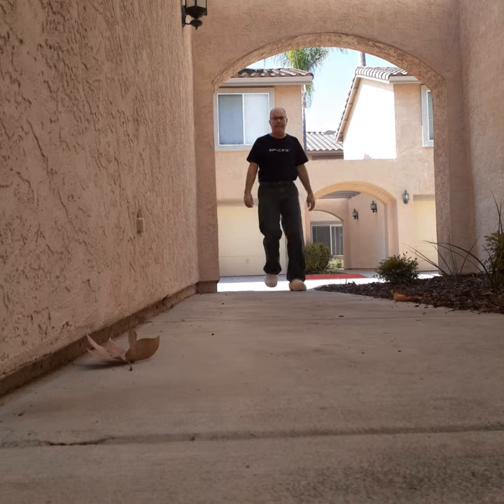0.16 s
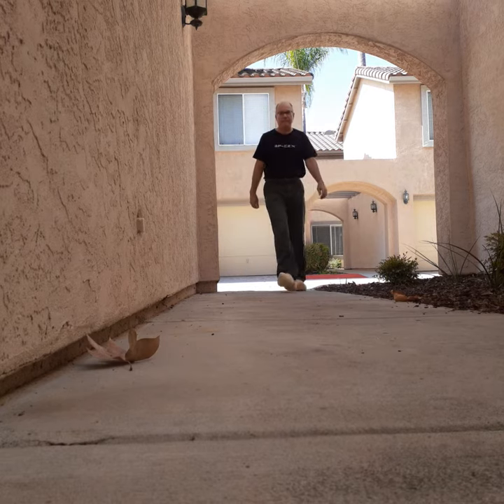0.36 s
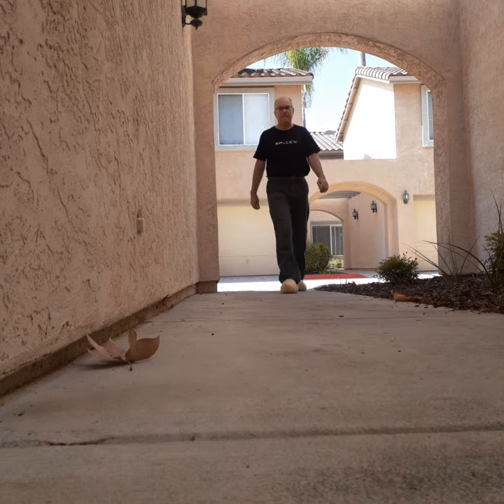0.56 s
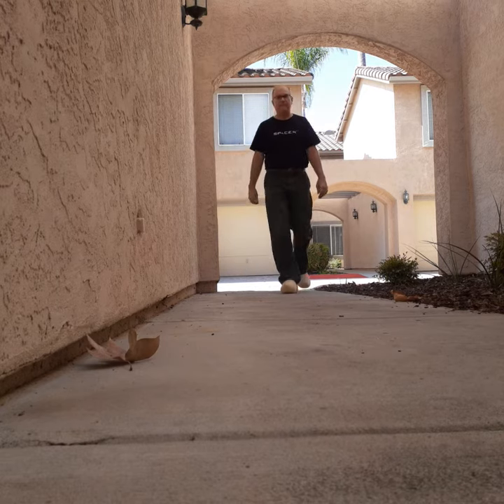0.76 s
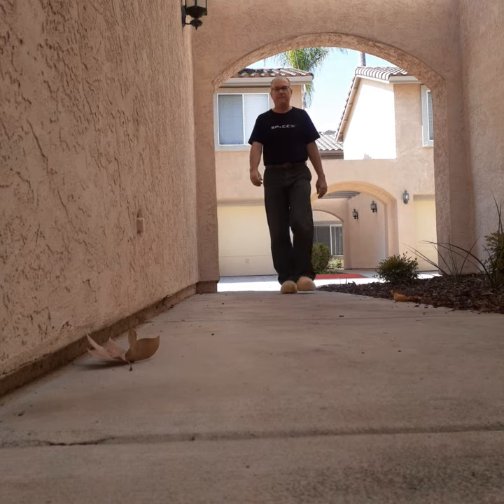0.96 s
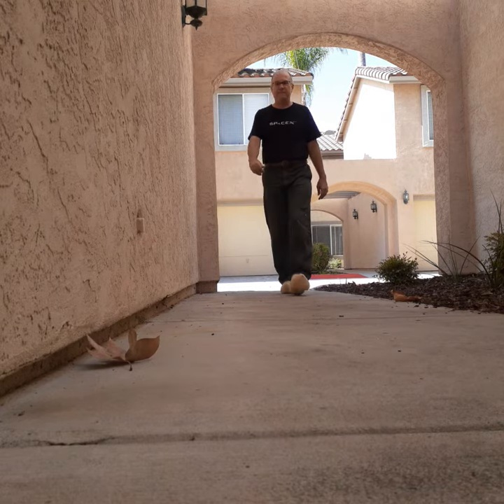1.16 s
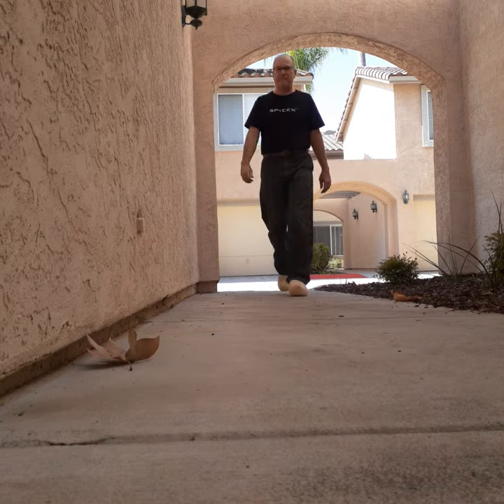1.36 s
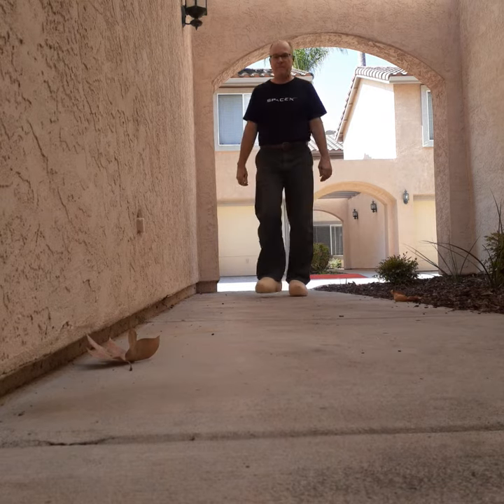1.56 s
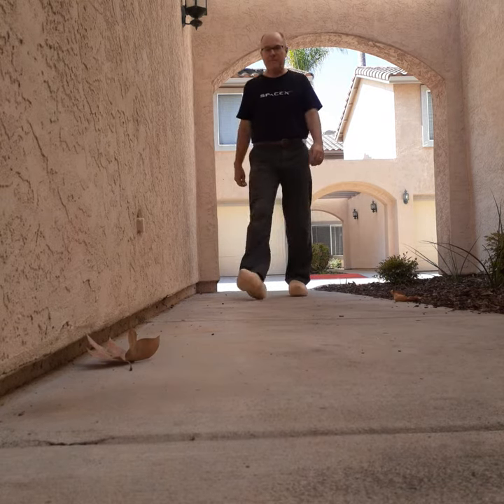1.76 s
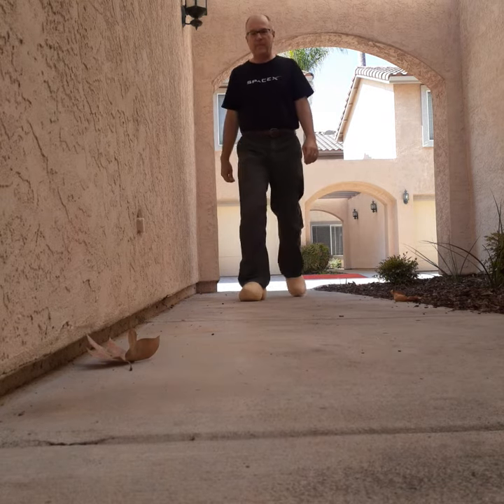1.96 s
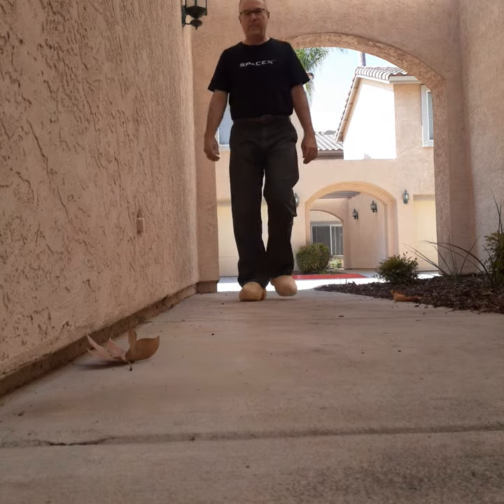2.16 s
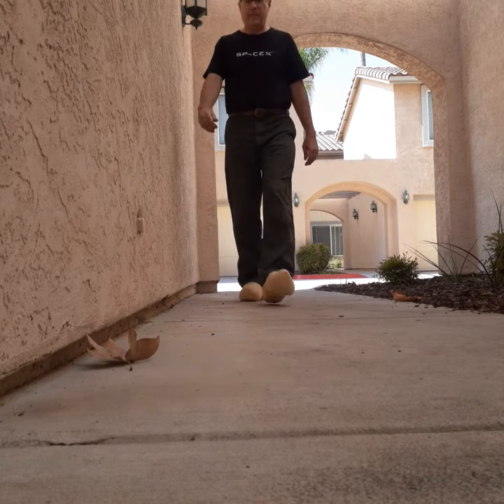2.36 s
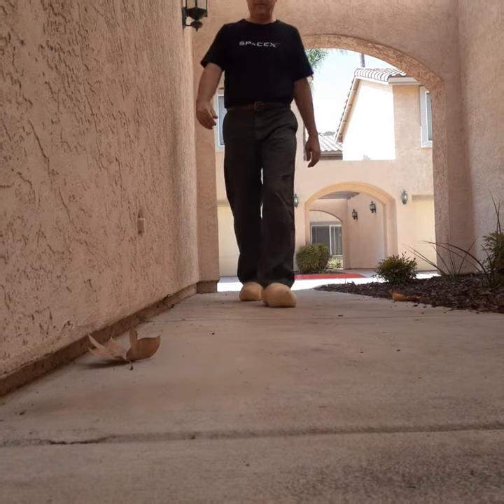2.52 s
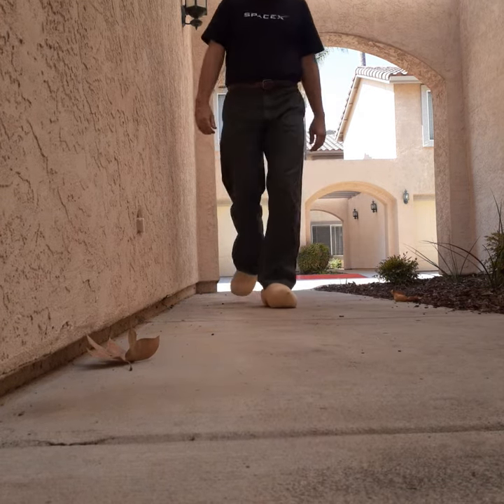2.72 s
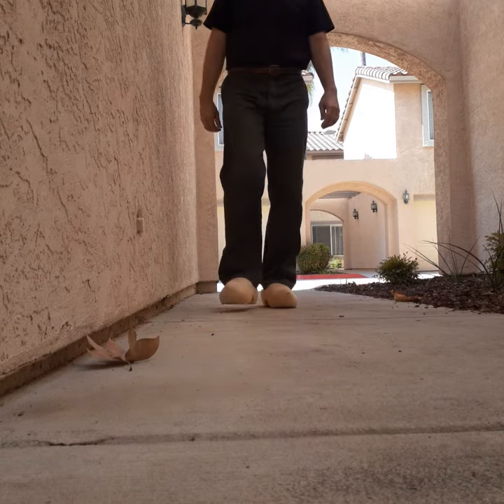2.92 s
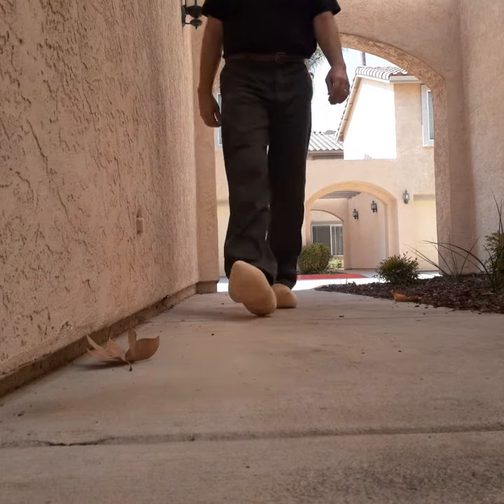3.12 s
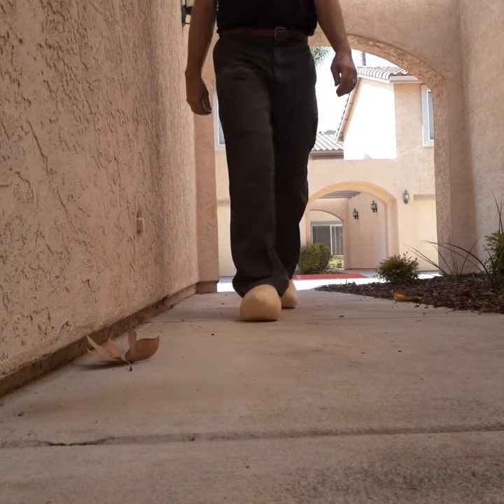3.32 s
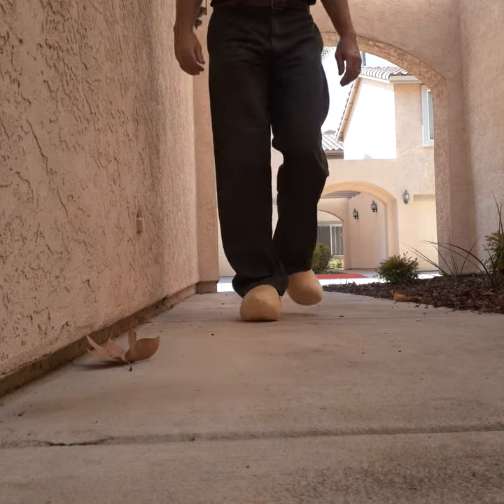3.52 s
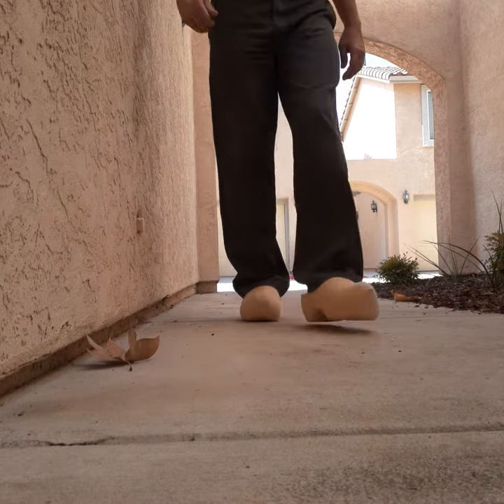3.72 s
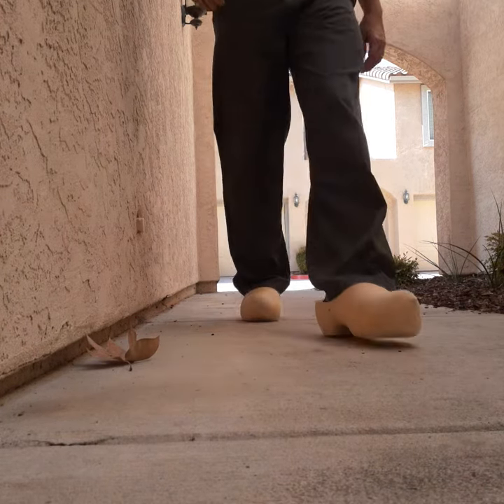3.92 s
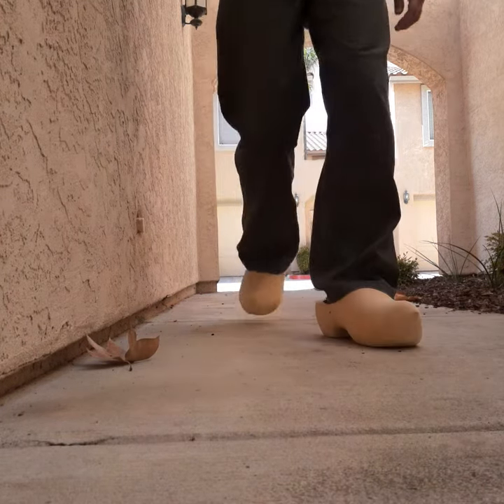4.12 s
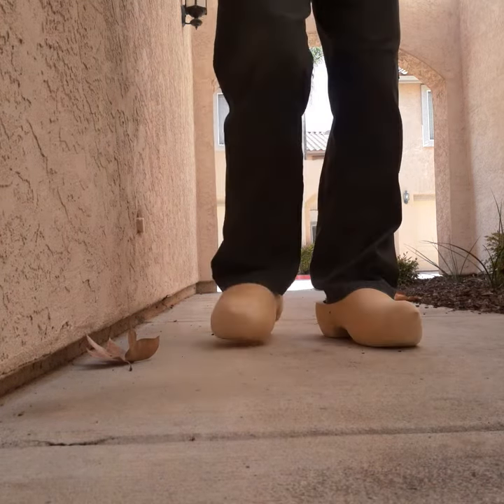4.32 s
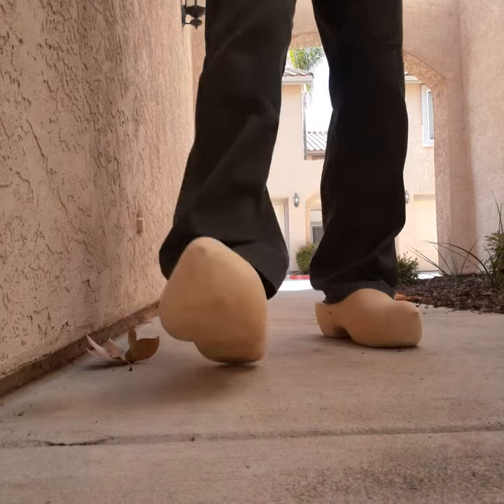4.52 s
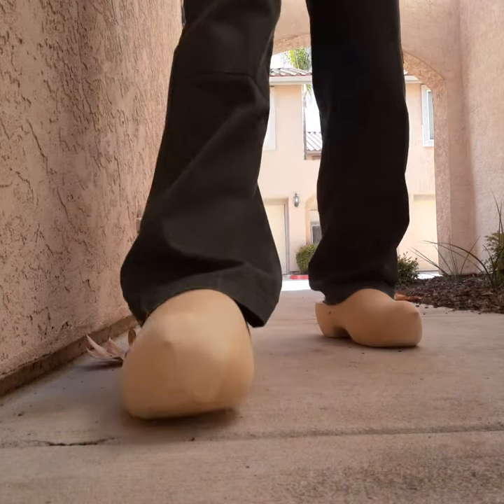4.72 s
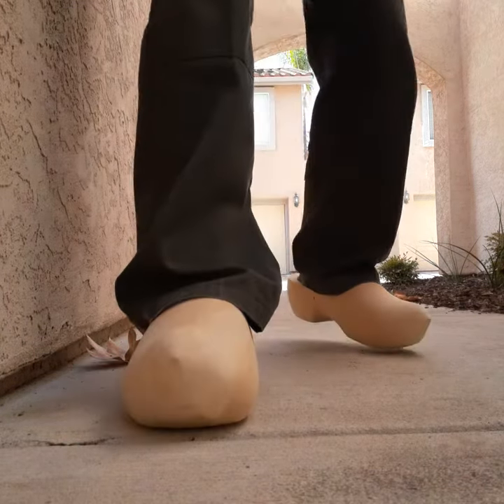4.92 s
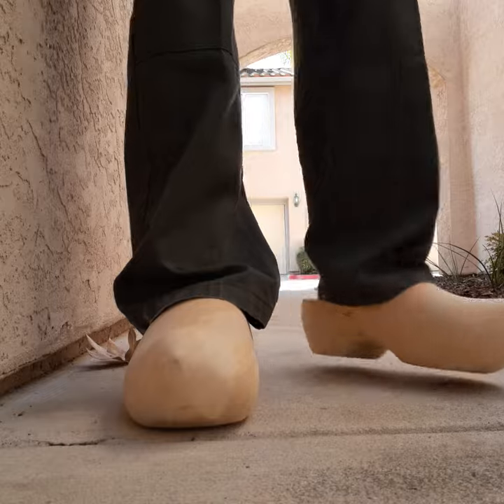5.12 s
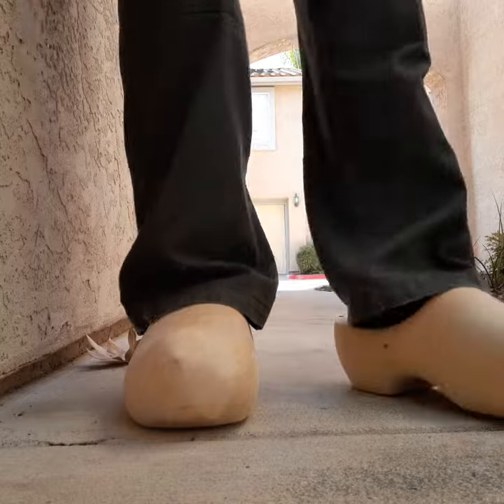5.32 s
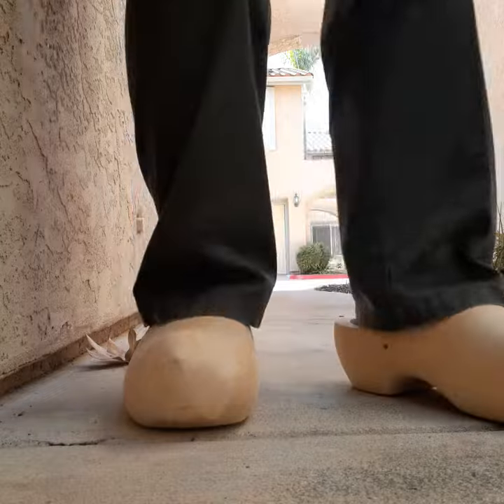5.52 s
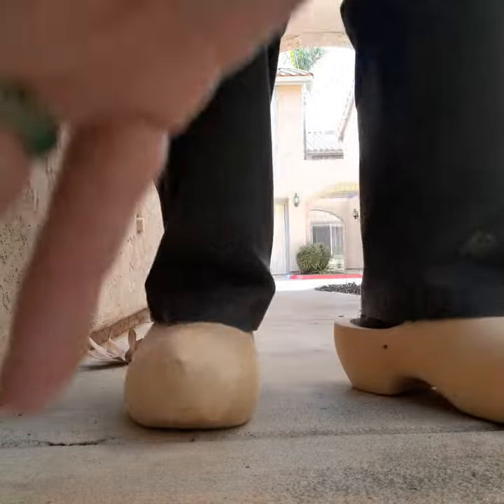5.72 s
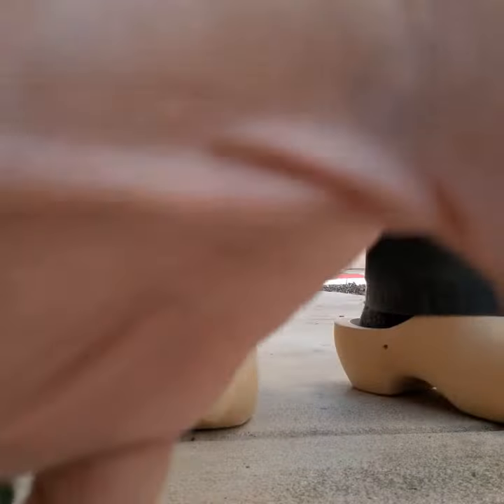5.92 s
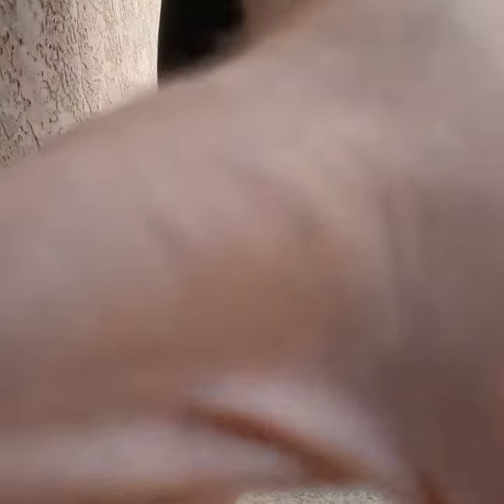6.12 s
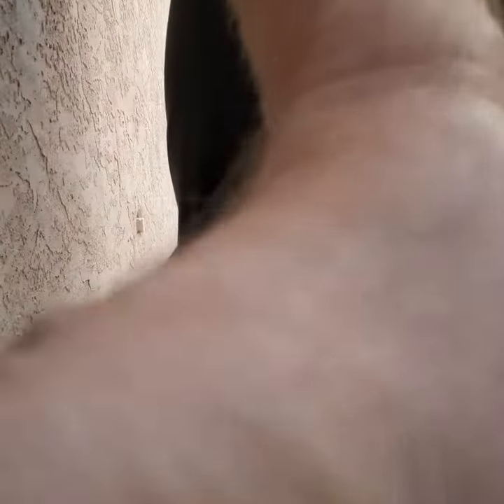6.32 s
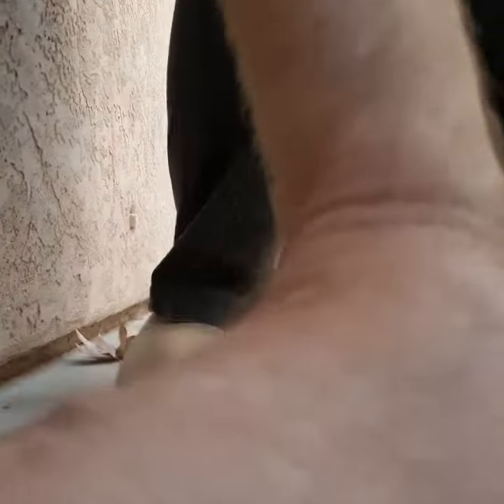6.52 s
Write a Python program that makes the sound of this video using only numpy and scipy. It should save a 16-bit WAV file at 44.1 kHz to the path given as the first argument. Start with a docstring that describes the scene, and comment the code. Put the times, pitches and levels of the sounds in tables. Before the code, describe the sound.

Someone in wooden clogs walks along a covered concrete passage toward the microphone. Heels knock and soles slap with a hollow clop, with grit crackling and trousers faintly rustling. The steps have a short echo at first and grow drier as they near; a heel drags, and a last step lands close by. Light ticks of fingers on the microphone follow. Traffic and an engine hum faintly far away.

```python
"""A hollow wooden clog slaps on concrete, and the walker comes closer down a covered passage and stops.
Heels knock and stutter and soles slap, each blow ringing the clog's cavity, heel block, sole, shell and
rim. Grit cracks and hisses underfoot, trouser cloth rustles, and the passage answers with a short reverb.
Traffic rumbles far off under an engine's drone; at the end a hand touches the microphone's case."""
import sys
import numpy as np
from scipy import signal
from scipy.io import wavfile

SR = 44100
rng = np.random.default_rng(int(sys.argv[2]) if len(sys.argv) > 2 else 0)


def waveform_to_disk(signal):
    """Save audio, clipped to [-1, 1], as 16-bit WAV at the path in sys.argv[1]."""
    frames = np.transpose(np.atleast_2d(signal))
    scaled = np.clip(frames, -1, 1) * 32767
    samples = np.round(scaled).astype(np.int16)
    wavfile.write(sys.argv[1], SR, samples)


N = 289825

# modes of the clog's five parts: f/Hz, relative level/dB, t60/s
CAVITY_MODES = [(242, -2.5, 0.044), (330.8, 10.5, 0.017)]
HEEL_MODES = [(435.7, 27.9, 0.0077), (707, 35.9, 0.0045)]
SOLE_MODES = [(890, 7, 0.0063), (1360, -3, 0.035)]
SHELL_MODES = [(1570, 3.5, 0.0059), (1965, 7, 0.0098), (2750, -5.5, 0.011)]
RIM_MODES = [(2190, 0, .018)]
# the heel edge knocks and stutters: t/s, strength/dB, hardness/0-1, grit crack/dB
HEEL_KNOCKS = [(0.541, -23.5, 0.49, -77), (1.092, -21.5, 0.52, -36.5), (1.143, -23, 0.35, -42),
               (1.162, -23, 0.08, -38.5), (1.208, -33, 0.27, -40), (1.282, -29.5, 0.68, -67),
               (1.805, -19, 0.42, -46), (1.827, -27, 0.61, -59.5), (1.83, -16.5, 0, -61),
               (2.455, -29, 0.54, -51.5), (2.465, -32.5, 0, -50.5), (2.472, -25, 0, -57),
               (2.481, -28, 0.07, -67), (2.563, -29, 0.68, -64), (3.177, -19, 0.07, -47.5),
               (3.2, -17, 0.01, -52.5), (3.206, -29, 0, -54), (3.287, -25, 0, -91), (3.873, -20, 0.16, -45),
               (4.452, -17.5, 0.39, -26), (4.473, -20, 0, -25.5), (4.489, -18, 0.2, -28.5),
               (4.54, -45, 0.4, -36), (4.55, -29, 0.58, -36), (4.695, -21, 0, -48.5),
               (4.704, -27, 0, -56.5), (4.711, -23, 0.25, -70), (4.725, -51, 0.7, -35.5),
               (4.764, -63, 0.3, -45), (4.791, -55, 0.6, -48), (4.817, -28, 0, -55), (4.836, -24, 0, -71),
               (5.292, -15.5, 0, -31), (5.305, -24, 0, -52), (5.31, -28.5, .05, -63)]
# the sole lands flat: t/s, strength/dB, hardness/0-1, toe reach/0-1, grit crack/dB, cavity f/Hz, sole f/Hz
SOLE_SLAPS = [(0.0, -12, 0.44, 0.22, -40, 336, 940), (0.631, -22.5, 0.18, 0.24, -46, 330, 900),
              (0.948, -28, 0.42, 0.4, -50.5, 334, 870), (1.059, -22, 0.28, .05, -37.5, 320, 900),
              (1.289, -15, 0.66, 0, -48, 323, 892), (1.928, -21, 0.15, 0, -80, 322, 843),
              (2.565, -7.5, 0.64, 0.47, -36.5, 345, 873), (3.99, -8, 0.61, 0.82, -33, 337, 873),
              (4.508, -36, 0.86, 0.45, -29.5, 334, 860), (4.524, -32.5, 0.88, 0.22, -35, 330, 900),
              (5.258, -20, 0.28, 0.07, -38.5, 300, 990), (5.28, -21.5, 0, 0, -37.5, 306, 965),
              (5.363, -7, 0.66, 0.2, -36, 264, 1093), (5.3665, -11, 0.36, 0.1, -43, 267, 1100)]
# drive of heel block, sole, shell and rim, relative to the cavity: soft blow/dB, hard blow/dB
KNOCK_DRIVE = [(-28.5, 0), (-20.5, -12), (-41, -31.5), (-40, -30)]
SLAP_DRIVE = [(-25, -17), (-9, 18), (-33.5, 7.5), (-33, 5.5)]
# the sole slides: start/s, end/s, grit hiss/dB, wood rumble/dB
SOLE_SCUFFS = [(0, 0.05, -66.5, -54), (0.573, 0.69, -67, -50.5), (0.912, 1.012, -66, -45),
               (1.06, 1.31, -59.5, -42), (1.81, 1.936, -67, -64), (2.472, 2.61, -62.5, -50.5),
               (3.182, 3.289, -63, -52), (3.599, 3.65, -74, -50.5), (3.869, 3.92, -52.5, -39),
               (4.484, 4.537, -50, -75.5), (4.614, 4.711, -49, -33), (4.83, 4.925, -50.5, -46.5),
               (5.255, 5.36, -54, -43)]
# colour of crushed grit: f/Hz, relative density/dB
GRIT_COLOUR = [(710, -46), (1200, -5.5), (2350, -4.5), (3700, -5.5), (6510, -1), (7100, -14.5), (11900, -1),
               (16000, -10)]
# shell resonances that rubbing excites: f/Hz, relative level/dB, t60/s
RUBBED_MODES = [(1530, 8, .035), (3050, -4, .012), (3600, 5, .016), (4180, 0, .014), (5140, -3, .012),
                (6450, -4, .01)]
# trouser cloth and hand: start/s, end/s, level/dB, fall/s
CLOTH_RUSTLES = [(2.225, 2.272, -61.5, 0.0077), (2.875, 2.927, -61, 0.0059), (3.62, 3.672, -53.5, 0.0087),
                 (5.36, 5.71, -54, 0.19), (6.428, 6.57, -62.5, .02)]
# the reverb send falls as the walker nears: t/s, level/dB
APPROACH_SEND = [(0, 3.5), (2, -0.9), (4, -3), (4.5, -9.5), (5.4, -12.5)]
# decay of the passage: f/Hz, t60/s
REVERB_T60 = [(120, 0.42), (320, 0.51), (840, 0.59), (2210, 0.52), (5820, 0.66)]
# colour of the passage: f/Hz, level/dB
REVERB_COLOUR = [(120, 1), (300, -5.5), (800, 0), (1500, 2.9), (2300, 6), (3400, 1), (6000, -0.5),
                 (12000, -6)]
# stereo image of grit, reverb and air: f/Hz, left-right correlation/0-1
STEREO_LIKENESS = [(130, .99), (290, 0.99), (640, 0.85), (1410, 0), (3100, 0.047), (12000, 0)]
# fingers on the case: t/s, level/dB, left minus right/dB, t60/s
FINGER_TICKS = [(5.7695, -38, -8, .016), (5.9705, -42, -6, .016), (6.503, -41, -14, .03),
                (6.5115, -29, -16, .005)]
# colour of traffic and air: f/Hz, relative density/dB
TRAFFIC_COLOUR = [(15, -54.5), (30, -48.5), (64, 7), (102, 0), (607, -22.5), (962, -22), (1610, -31.5),
                  (3520, -45), (6380, -37), (15000, -49.5)]
# fader of traffic and air: t/s, level/dB
TRAFFIC_LEVEL = [(0.0, -47.5), (1.99, -47), (2.18, -49), (6.57, -48.5)]
# pitch of the far engine: t/s, f/Hz
ENGINE_PITCH = [(.5, 74), (1.3, 70.5), (1.6, 81.5), (2.0, 86), (2.4, 103.5), (3.15, 107.5), (4.35, 126)]
# swells of the far engine: t/s, peak level/dB
ENGINE_SWELLS = [(.68, -43.5), (1.4, -40), (1.72, -38.5), (2.021, -39.5), (2.302, -48), (3.099, -51.5),
                 (4.353, -48.5)]

# per part (cavity, heel block, sole, shell, rim): low modes are pushed slowly, high ones tapped
CONTACT_S = (0.0028, 0.0017, 0.0011, 0.00029, 0.0003)
PART_SEND_DB = (-2.5, -3, -2, -11.5, -19.5)
CAVITY_HZ, SOLE_HZ = CAVITY_MODES[1][0], SOLE_MODES[0][0]   # strongest modes, before retuning
CAVITY_LAG_S = 0.0006   # the air under the foot answers a slap a little late
JUDDER_START_S, JUDDER_GAP_S = 4.599, 0.0094
SCUFF_RISE_S, SCUFF_FALL_S, CRACK_T60_S = 0.011, 0.01, 0.016
WOOD_TOP_HZ, LOW_CUT_HZ, HIGH_CUT_HZ = 2750, 51, 16660


def clog_blows():
    """Each blow rings the five parts, clacks the rim and snaps grit; the foot retunes cavity and sole."""
    s, *drives_db, crack_db, cavity_hz, sole_hz, lag_s = np.hstack([heel_knocks(), sole_slaps()])
    cavity_db, heel_db, sole_db, shell_db, rim_db = drives_db
    cavity_s, heel_s, sole_s, shell_s, rim_s = CONTACT_S
    parts = np.array([
        struck_wood(CAVITY_MODES, s + lag_s, cavity_db, cavity_s, tunings=cavity_hz / CAVITY_HZ),
        struck_wood(HEEL_MODES, s, heel_db, heel_s),
        struck_wood(SOLE_MODES, s, sole_db, sole_s, tunings=sole_hz / SOLE_HZ, plate=True),
        struck_wood(SHELL_MODES, s, shell_db, shell_s, plate=True),
        struck_wood(RIM_MODES, s, rim_db, rim_s, plate=True)])
    clack = butter(contact(clicks_at(s, from_db(rim_db)), rim_s / 2), [1400, 3200])
    return parts, clack, clicks_at(s, from_db(crack_db))


def struck_wood(modes, times, drives_db, contact_s, tunings=1, plate=False):
    """Damped modes ring in a new balance at every blow; a plate's modes alternate in sign."""
    t = np.arange(2600) / SR
    hz, mode_db, t60 = np.transpose(modes)[:, :, None]
    signs = (-1 if plate else 1) ** np.arange(len(modes))
    out = np.zeros(N + len(t))
    for start, db, tuning in np.broadcast(np.round(times * SR).astype(int), drives_db, tunings):
        spread_db = 1.5 * rng.standard_normal((len(modes), 1))
        decays = from_db(db + mode_db + spread_db - 60 * t / t60)
        out[start:start + len(t)] += signs @ (decays * np.sin(2 * np.pi * hz * tuning * t))
    dulled = butter(-contact(out, contact_s), WOOD_TOP_HZ, "low", order=4)
    return butter(dulled, 0.7 * modes[0][0], "high", order=3)   # little radiates below the lowest mode


def heel_knocks():
    """The heel edge strikes and judders, with cavity and sole at their own pitch and no lag."""
    s, db, hardness, crack_db = np.hstack([np.transpose(HEEL_KNOCKS), heel_judder(slips=10)])
    drives_db = part_drives(db, hardness, hardness, KNOCK_DRIVE)
    pitches_and_lag = np.outer([CAVITY_HZ, SOLE_HZ, 0], np.ones(len(s)))
    return np.vstack([s, *drives_db, crack_db, pitches_and_lag])


def heel_judder(slips):
    """A dragged heel sticks and slips, the slips growing stronger, hollower and less gritty."""
    s = JUDDER_START_S + JUDDER_GAP_S * (np.arange(slips) + 0.086 * rng.standard_normal(slips))
    db = np.linspace(-37.5, -26.5, slips) + 1.6 * rng.standard_normal(slips)
    hardness, crack_db = np.linspace(0.61, 0.12, slips), np.linspace(-29, -49, slips)
    return s, db, hardness, crack_db


def sole_slaps():
    """The flat of the sole lands, pitched by the foot's load."""
    s, db, hardness, toe, crack_db, cavity_hz, sole_hz = np.transpose(SOLE_SLAPS)
    drives_db = part_drives(db, hardness, toe, SLAP_DRIVE)
    return np.vstack([s, *drives_db, crack_db, cavity_hz, sole_hz, np.full(len(s), CAVITY_LAG_S)])


def part_drives(db, hardness, toe, shares):
    """Drive of each part in dB: hard blows reach heel block, sole and rim, the toe end rings the shell."""
    reaches = (hardness, hardness, toe, hardness)
    return [db] + [db + soft + (hard - soft) * reach for (soft, hard), reach in zip(shares, reaches)]


def scuffs(grit, snaps):
    """Grit hisses under a sliding sole and cracks under a blow; both make the shell sing."""
    friction = rng.standard_normal(N) * from_db(0.35 * drift(79))
    start, end, hiss_db, rumble_db = np.transpose(SOLE_SCUFFS)
    rumble = wood_rumble() * strokes(start, end, rumble_db, SCUFF_FALL_S)
    sliding = strokes(start, end, hiss_db, SCUFF_FALL_S) * from_db(3.5 * drift(70))
    crushing = fade(contact(snaps, 0.003), CRACK_T60_S)
    return grit * sliding, grit * crushing, rubbed_shell(friction, sliding + crushing), rumble


def wood_rumble(grains_per_s=300):
    """Grains rolling under the sole shake the cavity and the heel block."""
    hits = rng.random(N) < grains_per_s / SR
    grains = hits * from_db(1.6 * np.minimum(rng.exponential(1, N), 4)) * rng.choice([-1, 1], N)
    pushes = contact(grains, 0.0017)
    wood = sum(from_db(db) * ring(pushes, hz, t60) for hz, db, t60 in CAVITY_MODES + HEEL_MODES)
    return unit_rms(butter(wood, 150, "high"))


def rubbed_shell(friction, envelope, over_grit_db=3, flicker_db=3.5):
    """Friction rings the thin shell, each resonance coming and going."""
    steady_rms = np.std(sum(from_db(db) * ring(friction, hz, t60) for hz, db, t60 in RUBBED_MODES))
    song = sum(ring(friction * envelope * from_db(db + flicker_db * drift(20)), hz, t60)
               for hz, db, t60 in RUBBED_MODES)
    return from_db(over_grit_db) * song / steady_rms


def cloth_rustle(noise):
    """Trouser cloth and hand brush in smooth swells of noise."""
    return noise * strokes(*np.transpose(CLOTH_RUSTLES), rise_s=0.03)


def passage(send, positions=6, onset_s=0.0016):
    """Diffuse reverb builds briefly and dies band by band, with a new tail as the walker moves on."""
    t, out = np.arange(SR) / SR, np.zeros((2, N + SR))
    onset = 1 - np.exp(-(t / onset_s) ** 2)

    def decay(hz):
        t60 = at_hz(REVERB_T60, hz)
        return from_db(at_hz(REVERB_COLOUR, hz) - 60 * t / t60) / np.sqrt(t60)

    edges = np.linspace(0, N, positions + 1).astype(int)
    for start, end in zip(edges, edges[1:]):
        tail = stereo_noise(SR, decay) * onset / np.sqrt(SR / 14)
        out[:, start:end + SR - 1] += signal.fftconvolve(send[None, start:end], tail, axes=1)
    return out[:, :N]


def finger_touches():
    """Fingers send short, bright ticks through the microphone's case."""
    body = unit_rms(butter(rng.standard_normal(N), [556, 6940]))
    treble = unit_rms(butter(rng.standard_normal(N), [6940, HIGH_CUT_HZ]))
    ticks = sum(fade(clicks_at([s], from_db(db)), t60) * pan(pan_db) for s, db, pan_db, t60 in FINGER_TICKS)
    return (body + from_db(-7) * treble) * ticks


def far_traffic():
    """The rumble of traffic heaves while the hiss of the air stays nearly even."""
    shared_db = 0.83 * drift(0.15)

    def heave(hz):
        swing_db = (shared_db + 5 * drift(4.9)) * min(1, 250 / hz)
        return from_db(at_hz(TRAFFIC_COLOUR, hz) + swing_db)

    return from_db(in_time(TRAFFIC_LEVEL)) * unit_rms(stereo_noise(N, heave))


def far_engine(fade_db_per_s=69.5):
    """An engine's low drone climbs in pitch and swells now and then."""
    t = np.arange(N) / SR
    level_db = np.max([db - fade_db_per_s * abs(t - s) for s, db in ENGINE_SWELLS], axis=0)
    phase = 2 * np.pi * np.cumsum(in_time(ENGINE_PITCH)) / SR
    return np.sqrt(2) * from_db(level_db) * np.sin(phase)


def contact(clicks, length_s):
    """Soften each click into a smooth push of this length, peaking about 3 ms later."""
    t = np.arange(400) / SR - 0.003047
    push = np.cos(np.pi * np.clip(t / length_s, -0.5, 0.5)) ** 2
    return np.convolve(clicks, push / push.sum())[:N]


def strokes(starts, ends, levels_db, falls_s, rise_s=SCUFF_RISE_S):
    """Envelope of sliding contacts: linear attack, hold, exponential release."""
    t, out = np.arange(N) / SR, np.zeros(N)
    for start, end, db, fall_s in np.broadcast(starts, ends, levels_db, falls_s):
        attack = np.clip((t - start) / rise_s, 0, 1)
        out += from_db(db) * attack * np.exp(-np.maximum(t - end, 0) / fall_s)
    return out


def stereo_noise(length, gain_at_hz):
    """Half-octave bands of noise, each with its own gain and stereo width."""
    out, edges = 0, 25 * 2 ** np.arange(0, 9.6, 0.5)
    white = rng.standard_normal((2, 2, length))
    for k, (low, high) in enumerate(zip(edges, edges[1:])):
        mid, side = butter(white[k % 2], [low, high])
        hz = np.sqrt(low * high)
        alike = at_hz(STEREO_LIKENESS, hz)
        out = out + gain_at_hz(hz) * (np.sqrt(1 + alike) * mid + np.sqrt(1 - alike) * side * [[1], [-1]])
    return out


def drift(rate_hz):
    """Smooth random wobble of unit rms."""
    step, settle = 40, 2000
    r = np.exp(-2 * np.pi * rate_hz * step / SR)
    slow = signal.lfilter([1], [1, -2 * r, r * r], rng.standard_normal(N // step + settle + 2))[settle:]
    return np.interp(np.arange(N) / step, np.arange(len(slow)), unit_rms(slow))


def clicks_at(times, gains):
    """An impulse train."""
    out = np.zeros(N)
    np.add.at(out, np.round(np.asarray(times) * SR).astype(int), gains)
    return out


def ring(clicks, hz, t60):
    """A unit click sets a sine of height 1 ringing."""
    r, w = from_db(-60 / (t60 * SR)), 2 * np.pi * hz / SR
    return signal.lfilter([0, np.sin(w)], [1, -2 * r * np.cos(w), r * r], clicks + 1e-18)


def fade(clicks, t60):
    """Each click becomes a decaying envelope."""
    return signal.lfilter([1], [1, -from_db(-60 / (t60 * SR))], clicks + 1e-18)


def butter(x, hz, kind="band", order=2):
    """Band-, low- or high-pass filter."""
    return signal.sosfilt(signal.butter(order, hz, kind, fs=SR, output="sos"), x + 1e-18)


def in_time(points):
    """A table over time as a curve, one value a sample."""
    return np.interp(np.arange(N) / SR, *np.transpose(points))


def at_hz(points, hz):
    """Read a table on a log frequency axis."""
    freqs, values = np.transpose(points)
    return np.interp(np.log(hz), np.log(freqs), values)


def pan(left_over_right_db):
    """Left and right gains."""
    return from_db([[left_over_right_db / 2], [-left_over_right_db / 2]])


def from_db(db):
    """Decibels to gain."""
    return 10 ** (np.asarray(db) / 20)


def unit_rms(x):
    """Scale to unit rms."""
    return x / np.sqrt(np.mean(x ** 2) + 1e-20)


def scene():
    """The clogs grow drier as they approach, over a bed of far traffic."""
    wet_db = in_time(APPROACH_SEND)
    parts, clack, snaps = clog_blows()
    parts[-1] *= from_db(-wet_db - 5.5)   # the rim's own ring is heard from close by
    grit = unit_rms(stereo_noise(N, lambda hz: from_db(at_hz(GRIT_COLOUR, hz) + 2 * drift(44))))
    hiss, crack, shell, rumble = scuffs(grit, snaps)
    hiss = hiss + cloth_rustle(grit)   # cloth shares the grit's colour
    wood = parts.sum(axis=0) + rumble
    direct = np.array([np.roll(wood, 3), wood]) * pan(2)   # three samples late on the left
    direct += (hiss + crack + shell) * pan(-5)
    # low knocks and the rim's clack echo in the passage; the rings of shell and rim stay mostly dry
    wood_send = from_db(PART_SEND_DB) @ parts + from_db(-3) * rumble + from_db(17.5) * clack
    grit_send = from_db(2) * hiss[0] + from_db(21.5) * contact(snaps, 0.0001)
    reverb = passage(from_db(wet_db) * (wood_send + grit_send)) * pan(0.8)
    return direct + reverb + finger_touches() + (far_traffic() + far_engine()) * pan(1.2)


def record(dry):
    """Round off the loudest peaks, then trim the deepest bass and the very top."""
    rounded = 2.5 * np.tanh(dry / 2.5)
    trimmed = butter(rounded, LOW_CUT_HZ, "high", order=1)
    return signal.sosfilt(signal.cheby2(12, 70, HIGH_CUT_HZ, fs=SR, output="sos"), trimmed)


dry = scene()
out = record(dry)
waveform_to_disk(out)
```